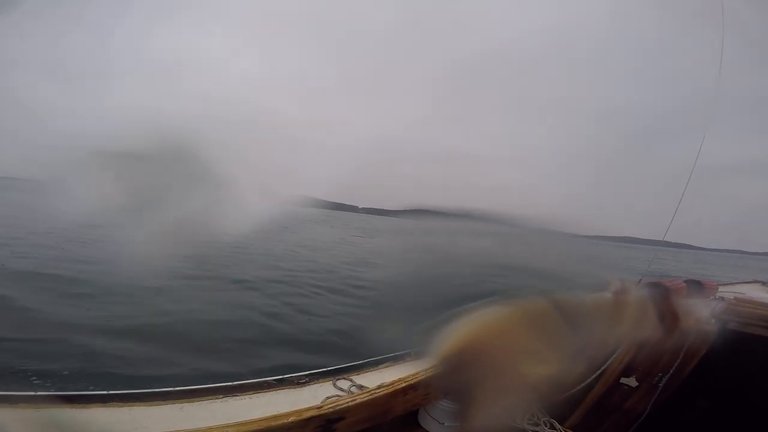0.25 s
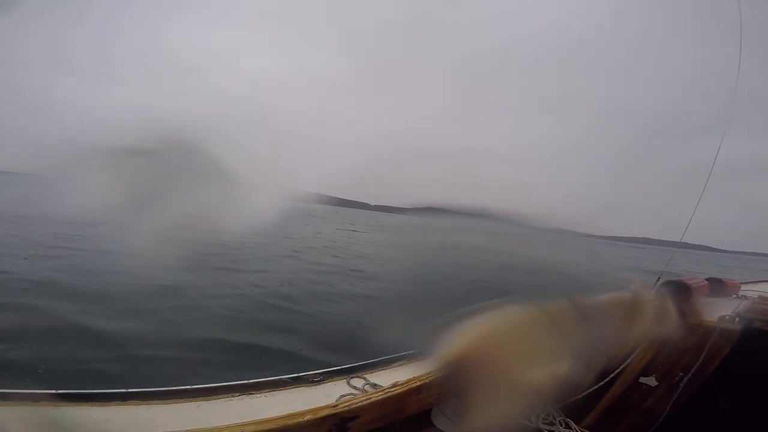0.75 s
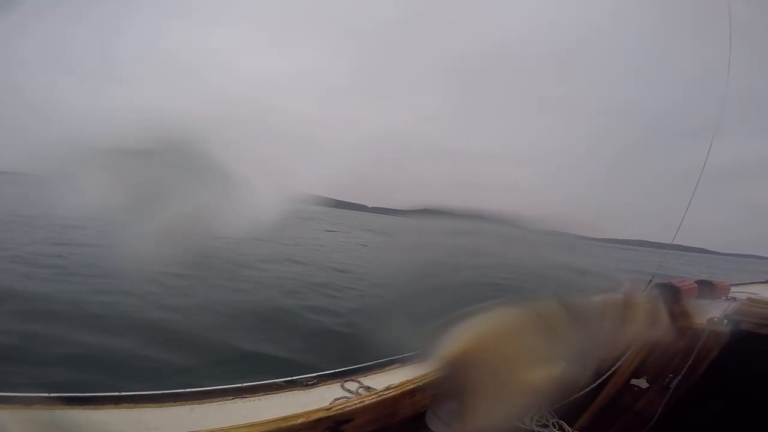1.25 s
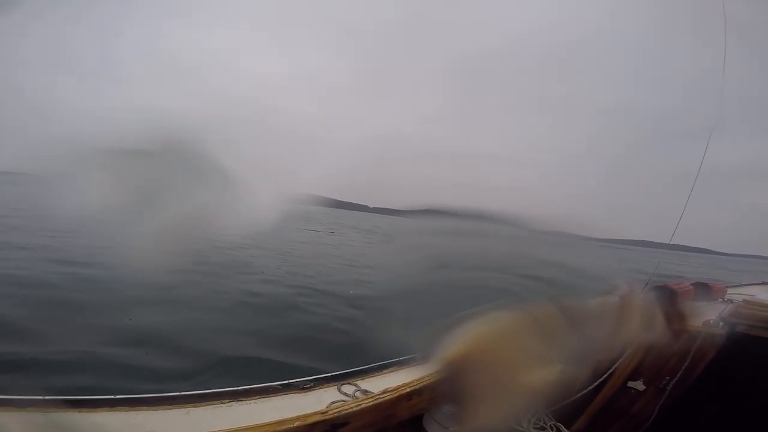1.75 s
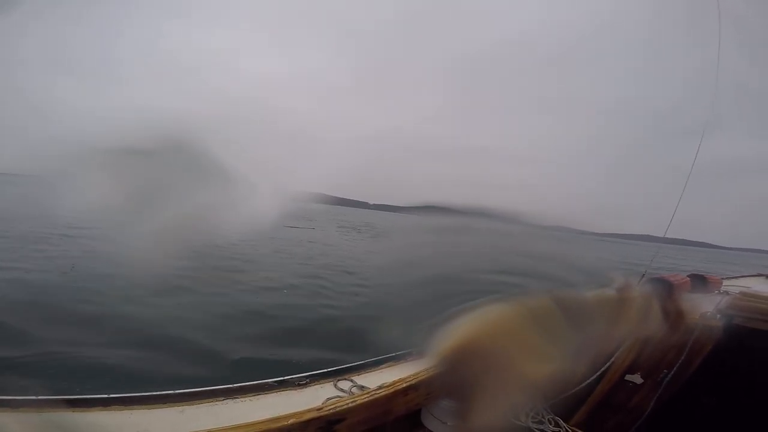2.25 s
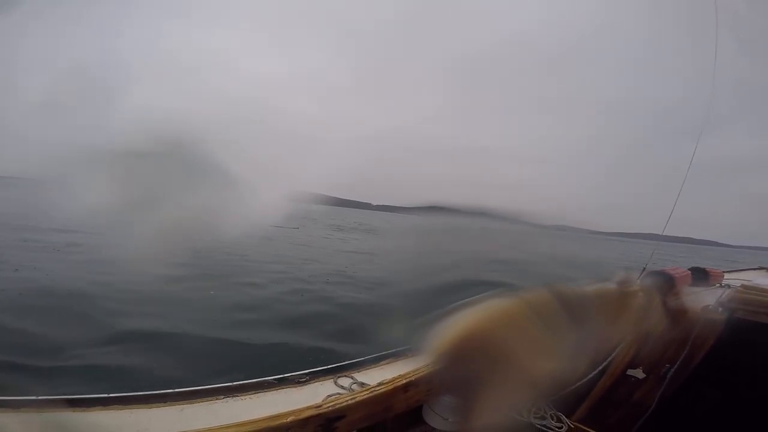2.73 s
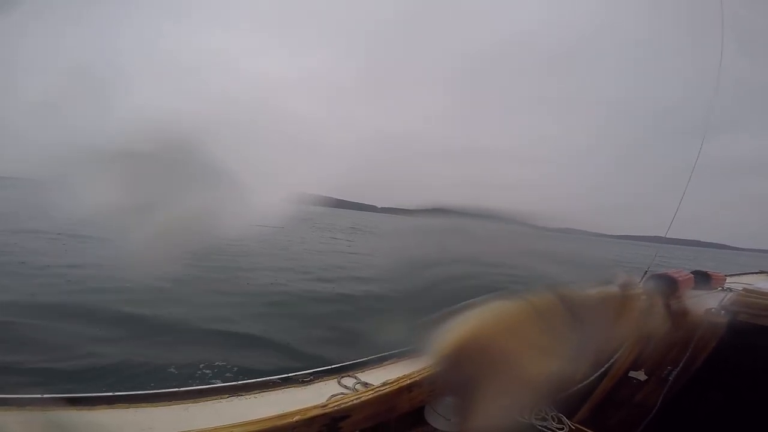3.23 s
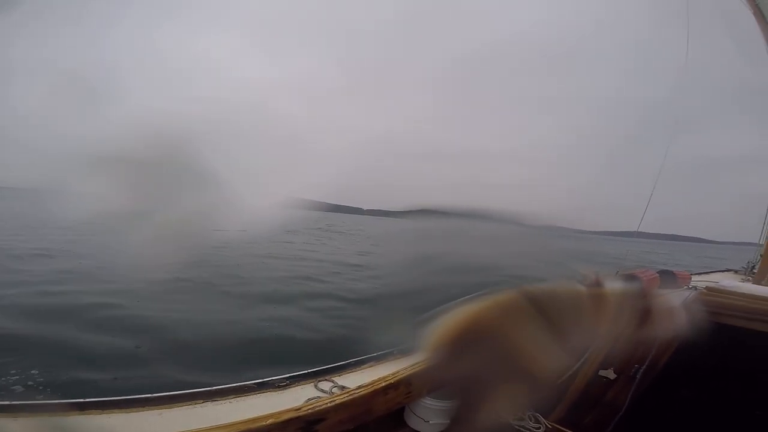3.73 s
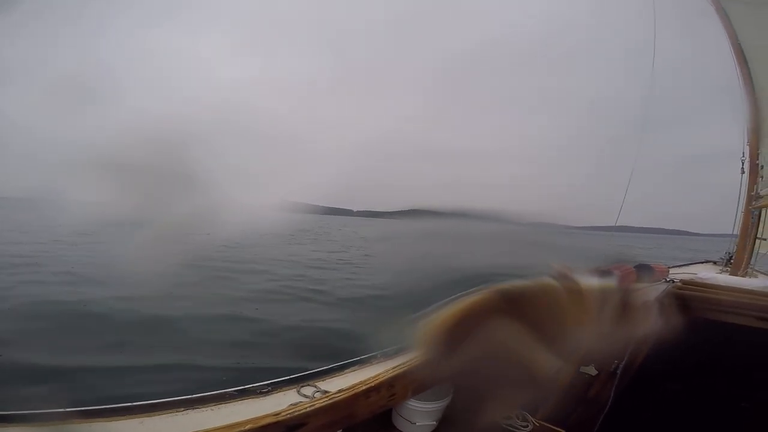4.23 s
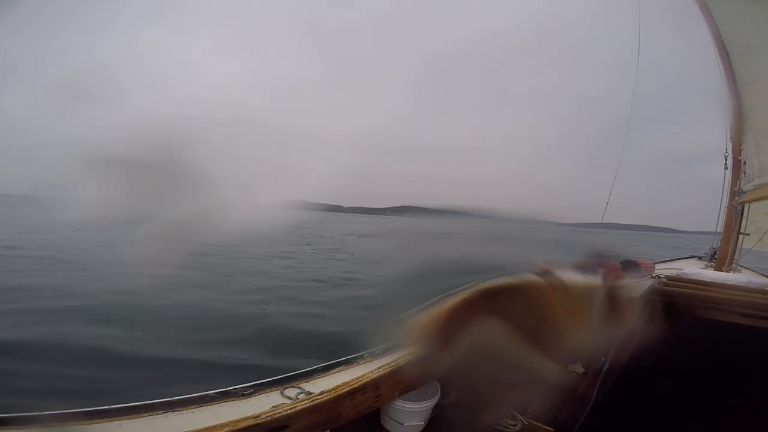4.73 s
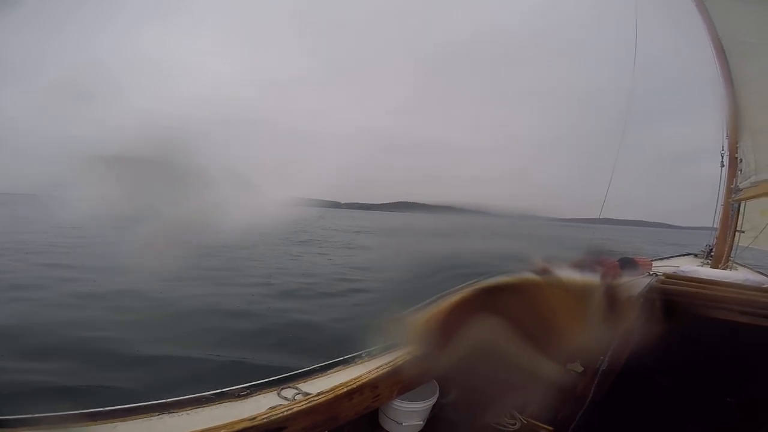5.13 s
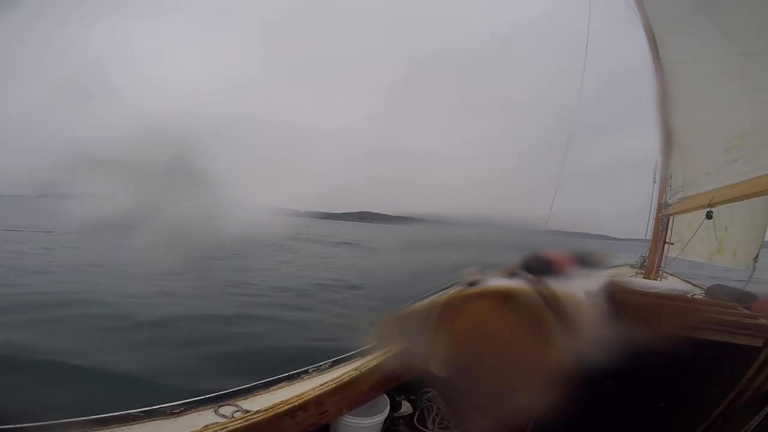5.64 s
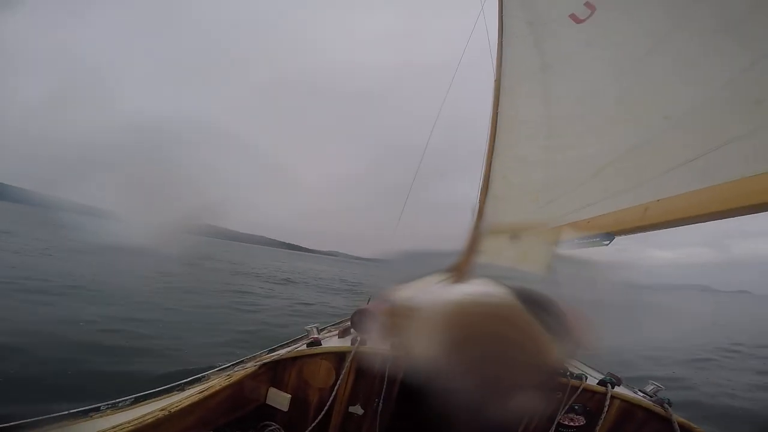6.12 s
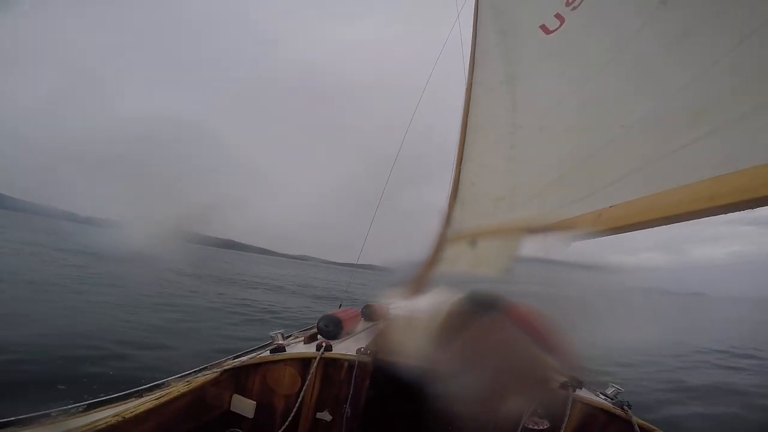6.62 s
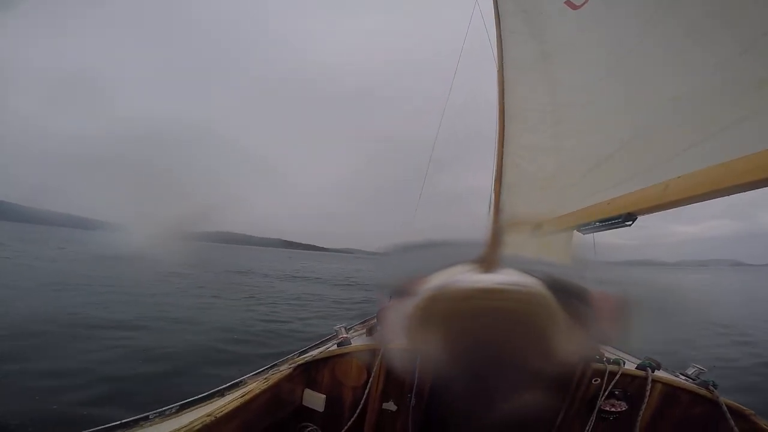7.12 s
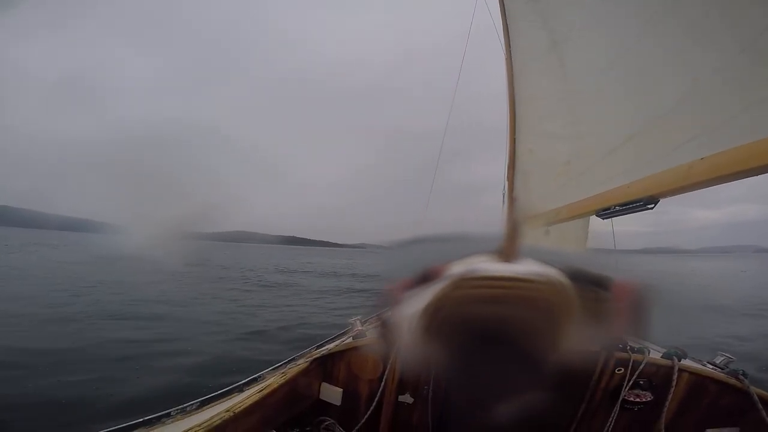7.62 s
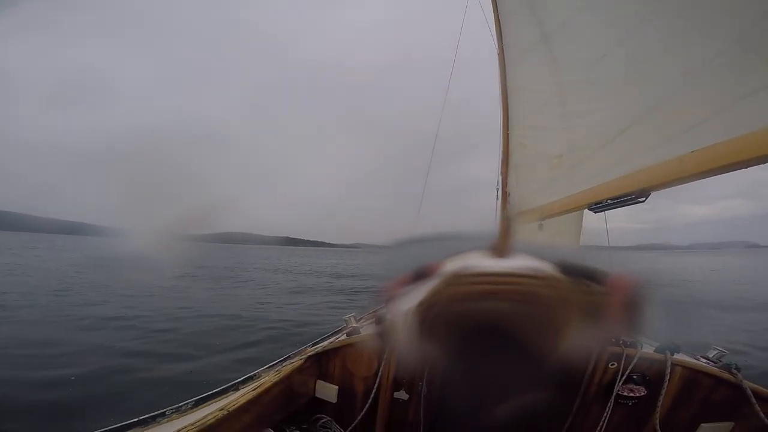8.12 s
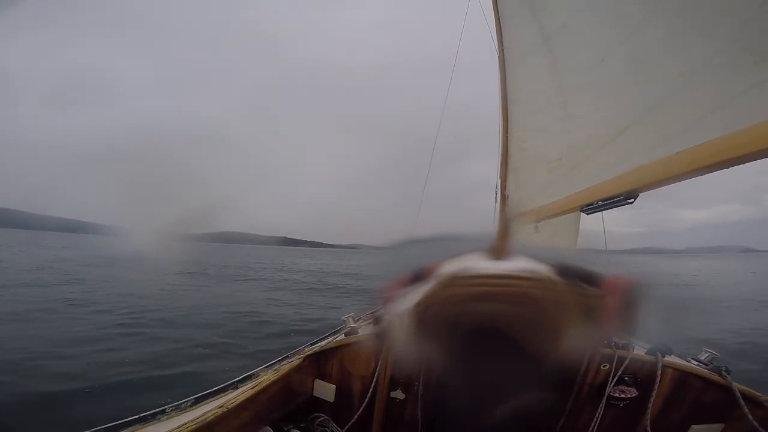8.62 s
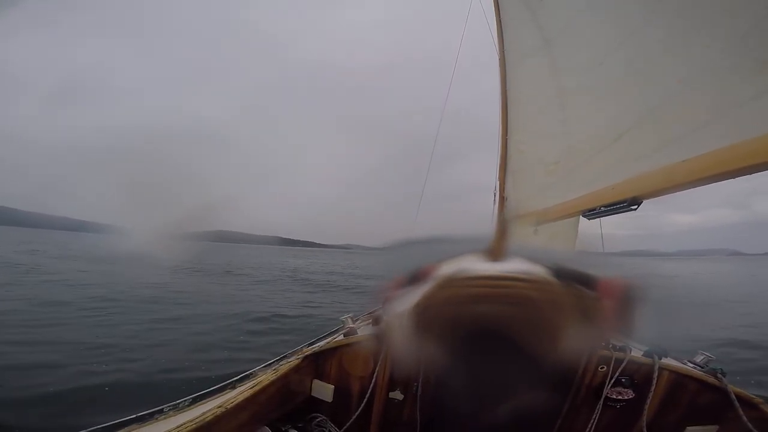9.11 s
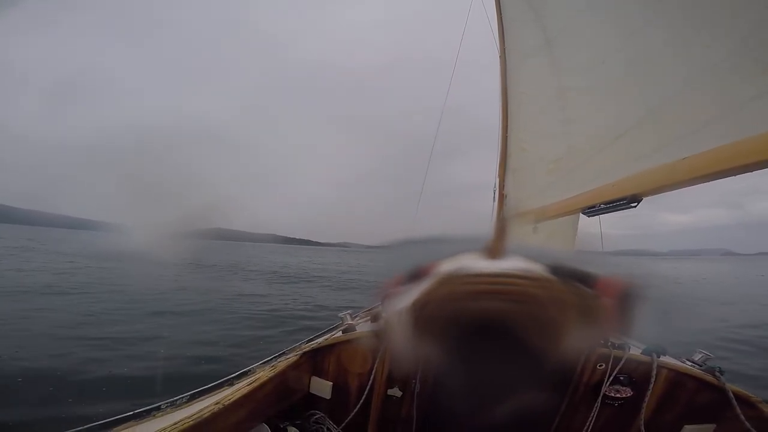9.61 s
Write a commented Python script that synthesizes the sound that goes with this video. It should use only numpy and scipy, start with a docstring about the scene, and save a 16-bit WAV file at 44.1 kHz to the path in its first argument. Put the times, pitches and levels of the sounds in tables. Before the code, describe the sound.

The microphone is sealed in a plastic housing on a sailor's head, so everything is close, dry and muffled. A low, uneven wind and water rumble with faint steady hiss runs throughout, and a very low pulse thumps softly about every 0.6 s, slightly quickening. Raindrops pat dully on a wet hood from the start, in irregular clusters. From 0.7 s a few drops tick on the housing; the sharpest clicks, with a tiny plastic ring, come at about 2.5, 4.3 and 7.5 s. Stronger pats fall near 3.1, 3.8, 4.7 and 5.5 s. From 5.8 to 6.4 s the head turns: a deep wobble grows, fabric rubs and creases crackle. Two short, low gusts swell near 7 and 7.9 s, then busier pats continue, strongest around 8.7, 9.2 and 9.7 s, with a last slight gust.

```python
"""Light rain on a small sailboat, heard inside a waterproof camera housing worn on the helmsman's head.
From the start, noise-excited drops pat on the rain hood and a quickening pulse thumps through the strap,
over a low filtered-noise rumble of wind and water; soon drops make the housing's wall modes tick and ring.
Near 6 s the head turns: the camera sways, the hood rubs and its creases let go.
From 7 s two gusts swell close together, more drops tick, and the pats go on to the end."""
import sys
import numpy as np
from scipy import signal
from scipy.fft import rfft, irfft, next_fast_len
from scipy.io import wavfile

SR = 44100
rng = np.random.default_rng(int(sys.argv[2]) if len(sys.argv) > 2 else 0)


def persist_wave(psi):
    """Save psi, clipped to +-1, as 16-bit WAV."""
    counts = np.round(np.clip(psi, -1, 1) * 32767).astype(np.int16)
    wavfile.write(sys.argv[1], SR, np.atleast_2d(counts).T)


N = 434826
SIZE = 8192  # samples in one short sound
AGE = np.arange(SIZE) / SR  # seconds since its onset
TIME = np.arange(N) / SR
TURN_START_S, TURN_STOP_S, SETTLED_S = 5.81, 6.217, 6.36  # full speed, slowing, strap settled


def undb(db):
    """Amplitude ratio: 20 dB is a factor of ten."""
    return 10 ** (np.asarray(db) / 20)


def unit(x):
    """Normalise the effective value: scale to rms 1."""
    return x / np.sqrt(np.mean(x ** 2))


def burst(x):
    """Normalise the energy: scale a short sound to that of one millisecond at rms 1."""
    return x / np.sqrt(np.sum(x ** 2) / (SR / 1000))


def add(track, s, sound):
    """Superposition: mix a sound in at time s, in seconds."""
    start = int(np.clip(s * SR, 0, N - 1))
    track[start:start + len(sound)] += sound[:N - start]


def colour(points, size):
    """Spectral envelope: gains of an (Hz, dB) outline, falling away beyond both ends."""
    hz, db = np.transpose(points)
    bins_hz = np.fft.rfftfreq(size, 1 / SR) + 1
    skirts = np.minimum(bins_hz / hz[0], 1) * np.minimum(hz[-1] / bins_hz, 1) ** 2
    return skirts * undb(np.interp(np.log(bins_hz), np.log(hz), db))


def noise(points):
    """Filtered noise: steady white noise shaped by a spectral envelope, at rms 1."""
    size = next_fast_len(N, True)
    spectrum = rfft(rng.standard_normal(size)) * colour(points, size)
    return unit(irfft(spectrum, size)[:N])


def walk(rate):
    """Slow random modulation: about rate chance values a second, joined by straight lines."""
    count = int(rate * N / SR) + 2
    return np.interp(TIME, np.linspace(0, N / SR, count), rng.standard_normal(count))


def response(gains):
    """Minimum phase: the causal impulse response with these gains, by folding the cepstrum."""
    cepstrum = irfft(np.log(gains + 1e-9))
    cepstrum[1:SIZE // 2] *= 2
    cepstrum[SIZE // 2 + 1:] = 0
    return irfft(np.exp(rfft(cepstrum)))


def modes(table):
    """Modal decay: one damped sine a mode, neighbours starting in opposite directions."""
    sines = []
    for k, (hz, db, t60) in enumerate(table):
        decay = undb(db - 60 * AGE / t60)
        sines.append((-1) ** k * decay * np.sin(2 * np.pi * hz * AGE))
    return np.array(sines)


def favour(hz, centre_hz, lift_db, octaves):
    """Point of excitation: the spot that is struck favours resonances around one frequency."""
    return undb(lift_db * np.exp(-(np.log2(hz / centre_hz) / octaves) ** 2))


def bend(sound, spread_s):
    """Dispersion of bending waves: the delay, spread_s at 1 kHz, goes as one over the root of frequency."""
    bins_hz = np.fft.rfftfreq(SIZE, 1 / SR)
    return irfft(rfft(sound) * np.exp(-4j * np.pi * spread_s * np.sqrt(1000 * bins_hz)))


def rattle(points, fade_s):
    """Impulsive noise: a burst that decays exponentially, in a given colour."""
    grains = rng.standard_normal(SIZE) * np.exp(-AGE / fade_s)
    return burst(irfft(rfft(grains) * rfft(response(colour(points, SIZE)))))


def swing(hz, rise_s):
    """Heavily damped oscillation: a push that swells to a peak at rise_s and dies."""
    return burst(np.sin(2 * np.pi * hz * AGE) * (AGE / rise_s) ** 2 * np.exp(-2 * AGE / rise_s))


def plateau(t, start_s, stop_s, rise_db_per_s, fall_db_per_s):
    """Exponential growth and decay: a dB envelope climbs to 0 at start_s, holds, and falls from stop_s."""
    rise_db = -rise_db_per_s * np.maximum(start_s - t, 0)
    fall_db = -fall_db_per_s * np.maximum(t - stop_s, 0)
    return rise_db + fall_db


def drag_db(t):
    """Friction drive: the drag of the hood builds up, holds through the turn and eases off."""
    return plateau(t, TURN_START_S, TURN_STOP_S, rise_db_per_s=115, fall_db_per_s=90.5)


# Spectra of the low rumble, the flutter above it and the thin hiss.
# Each row: frequency in Hz, relative level in dB.
RUMBLE_SPECTRUM = [(10, -22.5), (22, -1.5), (32, -1), (50, -5), (75, -12), (120, -28), (300, -56.5)]
FLUTTER_SPECTRUM = [(50, -7.5), (90, 0), (150, 2.5), (240, -13), (340, -23), (600, -39), (2000, -58)]
HISS_SPECTRUM = [(150, -30.5), (250, 1), (380, -5), (761, -7.5), (1400, -11.5), (1820, -7.5), (2440, -9.5),
                 (3060, -12), (5440, -15), (7570, -19.5), (9330, -19.5), (11100, -22.5), (13400, -20.5),
                 (14900, -23), (16000, -45)]
# Gusts and lulls of the wind.
# Each row: centre in seconds, half length in seconds, lift of the rumble in dB, lift of the flutter in dB.
WIND_GUSTS = [(.6, 0.33, 0.5, 6.5), (3.9, .2, 1.5, 0), (4.643, 0.22, -2.5, -7.5), (7.03, 0.26, 9.5, 13),
              (7.862, .13, 8, 4.5), (9.85, 0.17, 5.5, 5)]


def wind_and_water(rumble_db=-49.5, flutter_db=-64.5, hiss_db=-64.05, swell_db=3.1, gust_db=3.5):
    """Turbulence as modulated noise: rumble and flutter swell in gusts over an even hiss."""
    low_db = rumble_db + swell_db * walk(6)
    mid_db = flutter_db + gust_db * walk(12)
    for s, half_s, low_lift_db, mid_lift_db in WIND_GUSTS:
        gust = np.exp(-((TIME - s) / half_s) ** 2)
        low_db = low_db + low_lift_db * gust
        mid_db = mid_db + mid_lift_db * gust
    rumble = noise(RUMBLE_SPECTRUM) * undb(low_db)
    flutter = noise(FLUTTER_SPECTRUM) * undb(mid_db)
    hiss = noise(HISS_SPECTRUM) * undb(hiss_db)
    return rumble + flutter + hiss


FIRST_BEAT_S, BEAT_GAP_S = 0.063, 0.633  # first beat, first interval
QUICKEN_S = 0.0061  # each next interval is this much shorter
STRAP_HZ = 41.5  # rocking frequency at the middle of a beat
# Strength of the pulse through the strap, before its random unevenness.
# Each row: time in seconds, level in dB.
PULSE_STRENGTH = [(0, -30.5), (3, -30.5), (6.7, -30.5), (7.25, -37.5), (8.3, -33.5), (9, -29.5)]


def pulse_beats(count=17, width_s=0.032, droop_hz_per_s=140, uneven_db=2,
                jolt_db=-12, jolt_hz=72, jolt_s=0.0086, jolt_lead_s=0.008):
    """Mass on a spring: each beat jolts the camera, which rocks on its strap in two or three slowing swings."""
    out = np.zeros(N)
    for k in range(count):
        s = FIRST_BEAT_S + k * BEAT_GAP_S - QUICKEN_S * k * (k - 1) / 2
        start = max(s - SIZE / SR / 2, 0)
        t = AGE + start - s  # seconds from the middle of the beat
        phase = rng.random()
        cycles = STRAP_HZ * t - droop_hz_per_s * t ** 2 / 2 + phase
        rocking = np.exp(-(t / width_s) ** 2) * np.sin(2 * np.pi * cycles)
        jolt_shape = np.exp(-((t + jolt_lead_s) / jolt_s) ** 2)
        jolt = jolt_shape * np.sin(2 * np.pi * (jolt_hz * t + phase))
        strength = undb(np.interp(s, *np.transpose(PULSE_STRENGTH)))
        add(out, start, strength * (rocking + undb(jolt_db) * jolt))
    return out * undb(uneven_db * walk(70))


# Spectra of the camera shaking on its mount and of the hood rubbing over the strap.
# Each row: frequency in Hz, relative level in dB.
SHAKING_SPECTRUM = [(10, -19), (22, -8), (31, -10.5), (42, -3.5), (60, -7), (90, -24.5), (200, -50)]
RUBBING_SPECTRUM = [(50, -13), (100, 4.5), (160, -3.5), (240, -10.5), (360, -31), (700, -29.5), (1400, -43),
                    (2400, -35.5), (3400, -49), (6000, -56)]


def head_turn(rock_db=-23, rock_hz=31, shake_db=-26.5, rub_db=-39.5, catch_db=4):
    """Growing oscillation and friction: the camera sways wider until the head slows; the hood drags in catches."""
    sway_hz = rock_hz * (1 + 0.1153 * walk(33))
    sway = np.sin(2 * np.pi * np.cumsum(sway_hz) / SR)
    swing_db = plateau(TIME, TURN_STOP_S, TURN_STOP_S, rise_db_per_s=34.5, fall_db_per_s=52)
    slack_db = plateau(TIME, TURN_START_S, SETTLED_S, rise_db_per_s=136, fall_db_per_s=300)
    shaking = noise(SHAKING_SPECTRUM) * undb(shake_db)
    rocking = (sway * undb(rock_db) + shaking) * undb(swing_db + slack_db)
    rubbing = noise(RUBBING_SPECTRUM) * undb(drag_db(TIME) + rub_db)
    return rocking + rubbing * undb(catch_db * walk(70))


FOLD_OCTAVES = np.log2(np.geomspace(400, 6400, 21))  # where the folds' gains are drawn, log2 of Hz
# Spectra of a drop on wet cloth, of the cloth's shiver after it and of the fine splash.
# Each row: frequency in Hz, relative level in dB.
CLOTH_SPECTRUM = [(200, -23.5), (420, -16), (650, 0), (1150, -2.5), (1550, -4.5), (2200, 1.5), (2800, -4.5),
                  (3500, -16.5), (6000, -37), (15000, -54.5)]
SHIVER_SPECTRUM = [(70, -13), (130, 0.5), (250, 0), (400, -7), (620, -6.5), (950, -15), (1400, -11.5),
                   (2000, -15), (3000, -28.5)]
SPLASH_SPECTRUM = [(2000, -24.5), (3500, -0.5), (6200, -1), (7300, -15.5), (9000, -10.5), (11000, -17),
                   (16000, -24)]


def pat(db, hz, thud_db, splash_db, ripple=0.039, ripple_s=0.0062, reach=2.62, tock_db=-8.0,
        tock_cycles=3.3, thud_hz=175, sag_hz=100, patchy_db=4.0):
    """Impact on a dispersive membrane: a downward-sweeping pat, a tock, a late shiver, a dull thud and a splash."""
    bins_hz = np.fft.rfftfreq(SIZE, 1 / SR) + 1
    # the blow, followed by ripples that come back from seams and folds
    blow = ripple * rng.standard_normal(SIZE) * np.exp(-AGE / ripple_s)
    blow[0] += 1
    # a slack, low patch also cushions the blow and loses the top
    cushion = 1 / np.sqrt(1 + (bins_hz / (reach * hz)) ** 4)
    # every spot has its own uneven resonances, set by the folds around it
    folds_db = patchy_db * rng.standard_normal(len(FOLD_OCTAVES))
    folds = undb(np.interp(np.log2(bins_hz), FOLD_OCTAVES, folds_db))
    spot = favour(bins_hz, hz, lift_db=6, octaves=0.35)
    patch = response(colour(CLOTH_SPECTRUM, SIZE) * cushion * folds * spot)
    struck = irfft(rfft(blow) * rfft(patch))
    body = burst(bend(struck, spread_s=0.002392)) * undb(db - 1.5)
    tock = swing(hz, rise_s=tock_cycles / hz) * undb(db + tock_db)
    shiver_gain = np.hypot(undb(db - 8.5), undb(thud_db - 3))
    shiver = bend(rattle(SHIVER_SPECTRUM, fade_s=0.0071), spread_s=0.0042) * shiver_gain
    tension = np.exp(0.117 * rng.standard_normal())  # shifts both low pitches together
    thud = swing(thud_hz * tension, rise_s=0.0045) * undb(thud_db + 10.5)
    sag = swing(sag_hz * tension, rise_s=0.023) * undb(thud_db + 6.0)
    splash = rattle(SPLASH_SPECTRUM, fade_s=0.0022) * undb(splash_db + 3.5)
    return body + tock + shiver + thud + sag + splash


# Big creases of the hood letting go in the turn.
# Each row: start in seconds, level in dB before the trims inside pat().
BIG_CREASES = [(5.81, -46), (5.883, -42), (5.929, -43), (5.975, -38), (6.022, -37.5), (6.056, -41),
               (6.113, -39), (6.14, -46), (6.327, -46)]


def creases(count=26, small_db=-52, small_thud_db=-48, small_splash_db=-65,
            big_hz=600, big_thud_db=-40, big_splash_db=-63):
    """Sudden release of strain: creases of the dragged hood let go, a few big ones and many small."""
    out = np.zeros(N)
    for s, db in BIG_CREASES:
        add(out, s, pat(db, big_hz, big_thud_db, big_splash_db))
    for when, place in rng.random((count, 2)):
        at = TURN_START_S + when * (SETTLED_S - TURN_START_S)
        db = drag_db(at)
        hz = 600 * 4 ** place ** 2
        add(out, at, pat(db + small_db, hz, db + small_thud_db, db + small_splash_db))
    return out


def drizzle(drops_per_s=17, smallest_db=-56, spread_db=8.5, thud_db=-14, splash_db=-17):
    """Random independent impacts: small drops fall on the hood at chance times, sizes and places."""
    out = np.zeros(N)
    for when, size, place in rng.random((int(drops_per_s * N / SR), 3)):
        db = smallest_db + spread_db * size ** 2
        add(out, when * N / SR, pat(db, 650 * 4 ** place, db + thud_db, db + splash_db))
    return out


# Heavy drops on the hood; the levels are before the trims inside pat().
# Each row: start in seconds, level in dB, pitch of the patch in Hz, thud in dB, splash in dB.
HEAVY_DROPS = [(.024, -35, 994, -46, -58), (0.113, -45.5, 565, -53, -60), (0.306, -36.5, 1110, -48, -60),
               (.337, -47.5, 2620, -68, -57), (.413, -43, 680, -57, -62), (0.512, -47, 775, -53, -67),
               (.578, -38, 1030, -58, -72), (.647, -45.5, 789, -61, -72), (1.575, -42, 1940, -60, -58),
               (1.604, -40, 680, -51, -64), (1.766, -40, 622, -64, -68), (1.81, -43.5, 1920, -50.5, -61),
               (1.965, -35.5, 2080, -63, -58), (2.152, -45, 2750, -55, -62), (2.199, -40.5, 746, -70, -64),
               (2.244, -39.5, 640, -63, -58), (2.723, -50.5, 790, -67.5, -71.5),
               (2.792, -32.5, 594, -45.5, -57), (2.946, -43.5, 615, -58, -60),
               (3.003, -36.5, 2290, -51, -57), (3.044, -38.5, 730, -68, -65),
               (3.138, -30.5, 768, -43, -55.5), (3.264, -37.5, 665, -59, -73),
               (3.83, -25.5, 1160, -41, -45.5), (3.917, -47, 2090, -70, -68),
               (4.101, -42.5, 2480, -68.5, -61), (4.198, -35.5, 726, -53.5, -58),
               (4.367, -36.5, 764, -44, -70), (4.595, -47.5, 2200, -59, -71),
               (4.727, -28, 843, -44.5, -48.5), (4.808, -39, 612, -46, -60), (4.851, -43, 650, -66, -61),
               (5.034, -37.5, 1030, -68, -61), (5.297, -41.5, 1950, -59, -63.5),
               (5.461, -27, 600, -33, -71), (6.537, -48, 3140, -63.5, -62), (6.601, -35.5, 1945, -56, -54),
               (6.634, -41, 620, -60, -62), (6.731, -38.5, 700, -43, -60), (6.847, -47, 606, -38.5, -65),
               (7.091, -34.5, 1220, -53, -64), (7.141, -31.5, 643, -49, -60),
               (7.222, -31.5, 1980, -48, -59), (7.234, -37, 570, -54, -61), (7.644, -36, 950, -48, -58),
               (7.929, -55, 600, -48.5, -69), (8.199, -38, 2100, -75, -62), (8.253, -42.5, 580, -53.5, -69),
               (8.266, -36.5, 680, -62, -61), (8.353, -46, 780, -72, -68), (8.402, -42, 677, -72, -66.5),
               (8.535, -37, 1260, -68, -57), (8.682, -28.5, 2080, -60, -67), (8.693, -27.5, 675, -54, -67),
               (8.749, -31.5, 836, -46, -59), (8.84, -41, 2010, -68, -64), (8.984, -46, 600, -48, -77),
               (9.043, -34, 583, -44.5, -56), (9.111, -45, 617, -60, -62), (9.233, -24, 1287, -45, -64),
               (9.294, -39.5, 670, -53, -64), (9.316, -46.5, 2590, -70, -64), (9.386, -42, 715, -52, -65),
               (9.557, -42, 647, -51, -59), (9.66, -39, 2360, -55.5, -63), (9.679, -29, 776, -45, -52.5),
               (9.8, -45.5, 656, -69, -66)]


def hood_pats():
    """Local resonance: each heavy drop sounds the pitch of the patch of hood it strikes."""
    out = np.zeros(N)
    for s, db, hz, thud_db, splash_db in HEAVY_DROPS:
        add(out, s, pat(db, hz, thud_db, splash_db))
    return out


# Drops on the housing; the levels are before the trims of housing_ticks().
# Each row: start in seconds, level in dB, favoured resonance in Hz, its lift in dB,
# treble crack in dB, long ring in dB relative to the level.
HOUSING_DROPS = [(0.7447, -26, 1690, 18, -38.5, -3), (1.155, -39, 4700, 4, -47.5, 8),
                 (1.5309, -38, 2500, -4, -57.5, 2), (1.872, -19.5, 2410, 12, -44, -5),
                 (2.3367, -38, 2400, 8, -61, 5), (2.4897, 1, 1730, 12.5, -31.5, -2.5),
                 (2.538, -32.5, 2360, 3, -53.5, -8), (2.6111, -24.5, 1900, 9, -51, -5.5),
                 (2.8315, -22, 2040, 17, -43.5, -1), (3.3125, -27.5, 2370, -3.5, -54, -2),
                 (4.307, -3.5, 2957, 11, -17.5, -4), (5.9796, -29.5, 2780, 5, -57, -2),
                 (6.2579, -36.5, 1590, 4, -55, -10), (6.6657, -37.5, 2630, 8, -55.5, -2),
                 (7.253, -30.5, 2060, 11, -56, -2), (7.4103, -23.5, 2900, 6.5, -48.5, -2),
                 (7.4641, -0.5, 2590, 6, -28.5, -1), (7.9083, -21, 3080, 0, -43.5, -6),
                 (7.9172, -31, 2460, 25, -57, -6), (8.8176, -39, 3770, 13, -56, -2),
                 (8.9717, -30.5, 2070, 18, -45.5, -2)]
# The housing's damped wall modes, then its long-ringing modes.
# Each row: frequency in Hz, relative level in dB, time to decay by 60 dB in seconds.
DAMPED_WALL_MODES = [(1120, -5.5, 0.0092), (1797, 0, 0.013), (2430, 2, 0.0091), (2900, -3, 0.012),
                     (3593, -4, 0.01), (4276, -11, 0.0055), (4820, -12, 0.0064), (5650, -19.5, 0.0094),
                     (6690, -16, 0.00404), (8250, -23.5, 0.0058), (9390, -19.5, 0.0043), (10500, -22, .004),
                     (11800, -20.5, 0.0033), (14130, -27, 0.0024)]
LONG_RING_MODES = [(1816, -22, 0.078), (1940, -34.5, .075), (2070, -40, 0.046), (2261, -42.5, .06),
                   (2350, -43, 0.23), (2767, -46.5, .05), (3570, -49.5, 0.056), (5830, -45, 0.033)]


def housing_ticks(body_db=-5, crack_db=4.5, ring_db=-0.5, scatter_db=3.5, lag_s=0.0002,
                  wall_spread_s=0.00087, stiff_hz=800):
    """Modal excitation: direct hits crack the plastic walls' damped modes, then a faint ring near 2 kHz."""
    out = np.zeros(N)
    walls, rings = modes(DAMPED_WALL_MODES), modes(LONG_RING_MODES)
    wall_hz, ring_hz = np.array(DAMPED_WALL_MODES)[:, 0], np.array(LONG_RING_MODES)[:, 0]
    treble = wall_hz > 4200
    for s, db, hz, lift_db, treble_db, long_db in HOUSING_DROPS:
        scatter = undb(scatter_db * rng.standard_normal(len(walls)))
        weight = favour(wall_hz, hz, lift_db, octaves=0.23) * scatter
        body = burst((weight * ~treble) @ walls) * undb(db + body_db)
        crack = burst((weight * treble) @ walls) * undb(treble_db + crack_db)
        ring_weight = undb(db + ring_db + long_db) * favour(ring_hz, hz, lift_db=5.5, octaves=0.3)
        ring = ring_weight @ rings
        add(out, s + lag_s, bend(body + crack + ring, spread_s=wall_spread_s))
    # the small stiff walls radiate almost no bass
    return signal.sosfilt(signal.butter(2, stiff_hz, "high", fs=SR, output="sos"), out)


def scene():
    """Superposition: all the sources add up at one microphone inside the housing."""
    rain = housing_ticks() + hood_pats() + drizzle()
    wearer = head_turn() + creases() + pulse_beats()
    return (rain + wearer + wind_and_water())[None]


def record(dry):
    """Band limiting: the camera cuts the top above 15.6 kHz with a steep low-pass."""
    return signal.sosfilt(signal.ellip(8, 0.2, 70, 15600, fs=SR, output="sos"), dry)


dry = scene()
out = record(dry)
persist_wave(out)
```